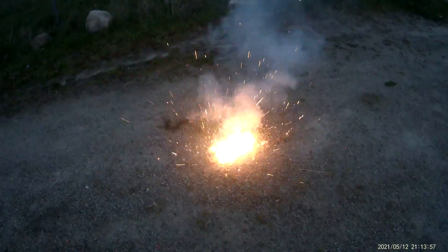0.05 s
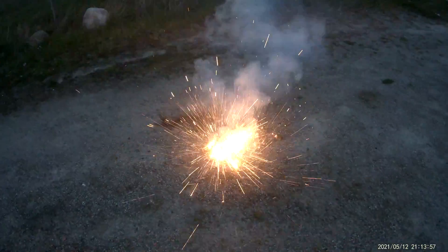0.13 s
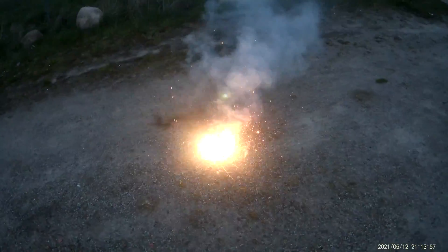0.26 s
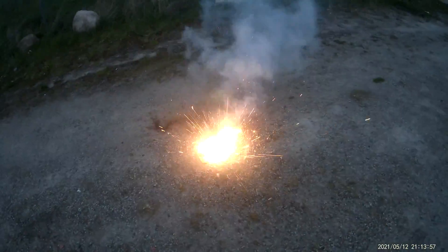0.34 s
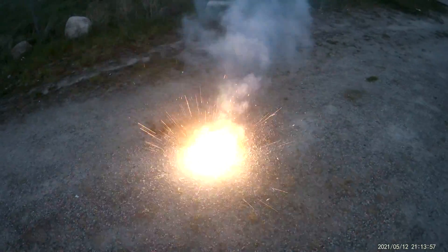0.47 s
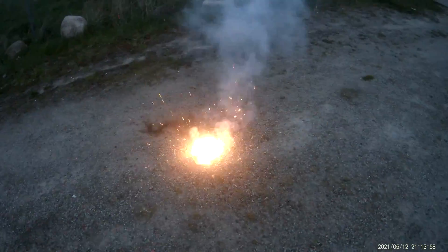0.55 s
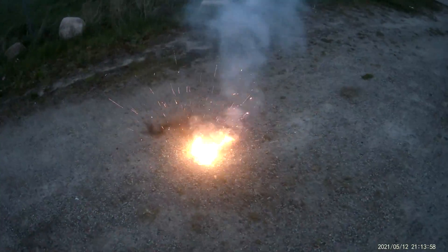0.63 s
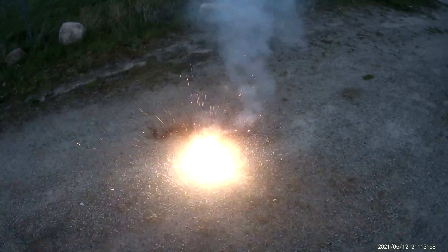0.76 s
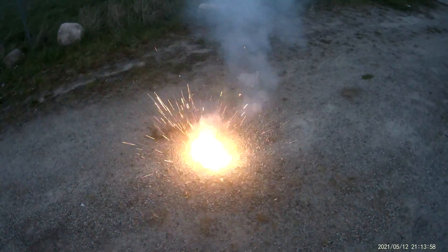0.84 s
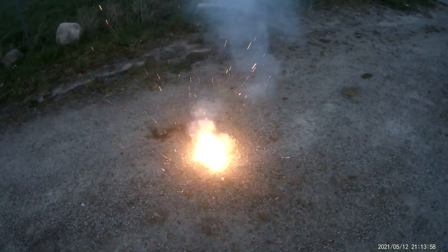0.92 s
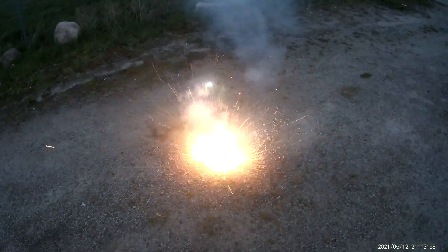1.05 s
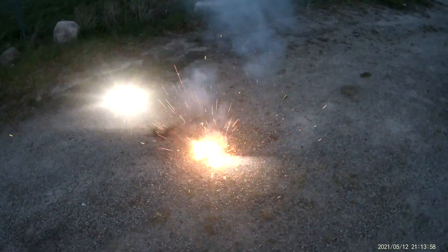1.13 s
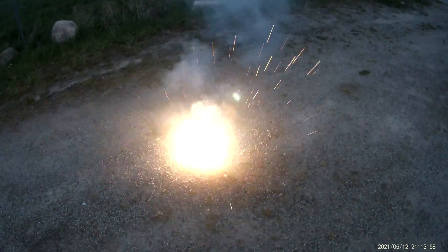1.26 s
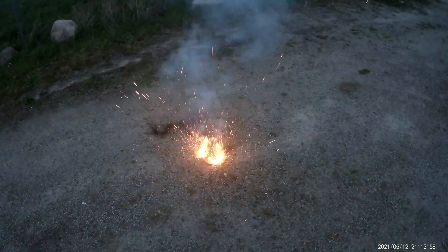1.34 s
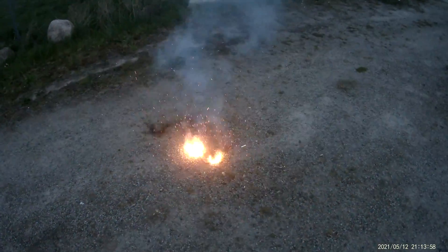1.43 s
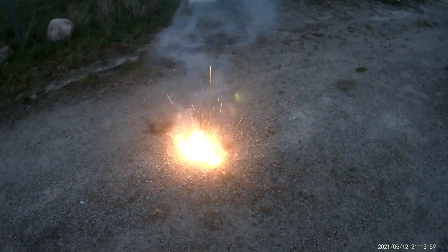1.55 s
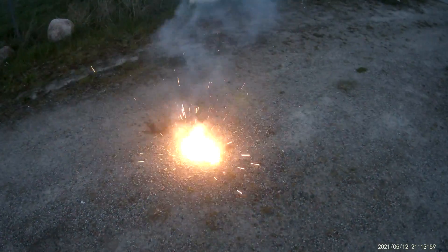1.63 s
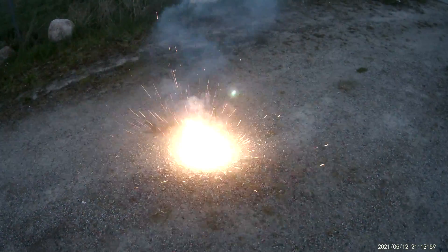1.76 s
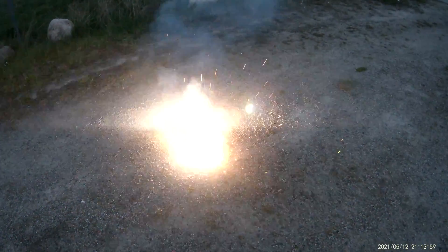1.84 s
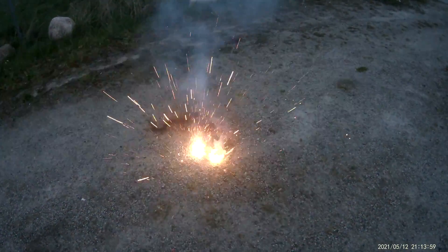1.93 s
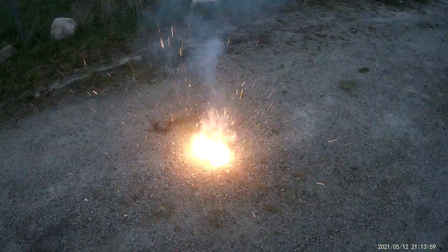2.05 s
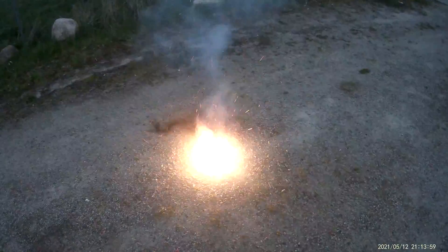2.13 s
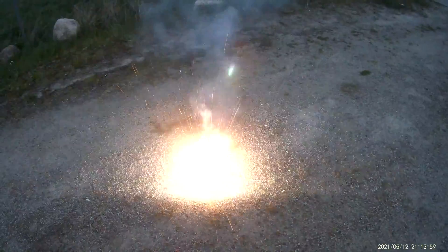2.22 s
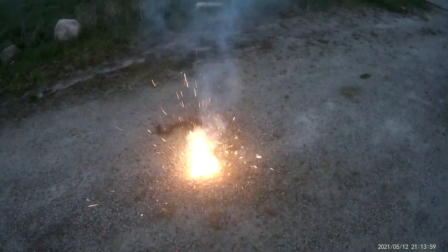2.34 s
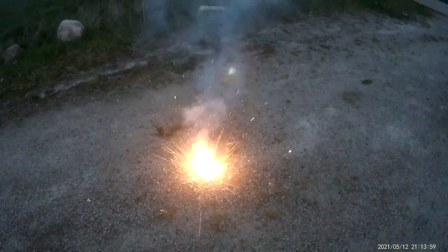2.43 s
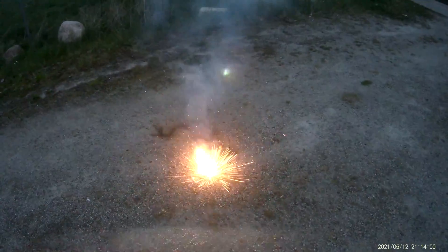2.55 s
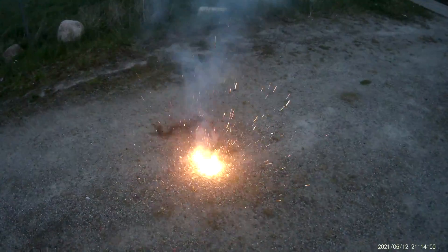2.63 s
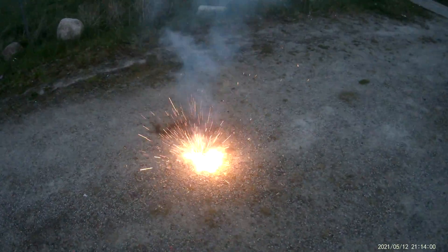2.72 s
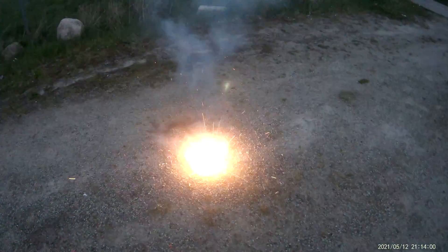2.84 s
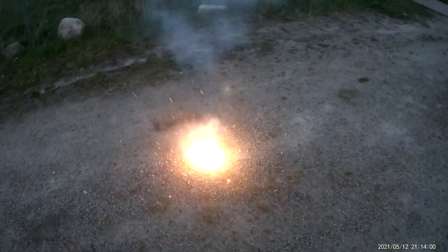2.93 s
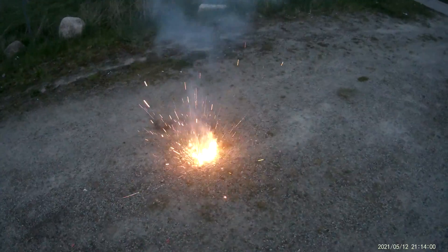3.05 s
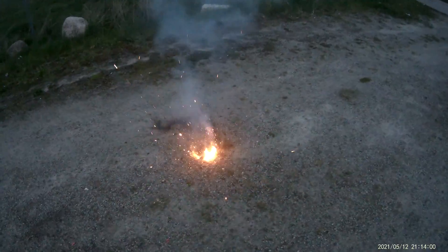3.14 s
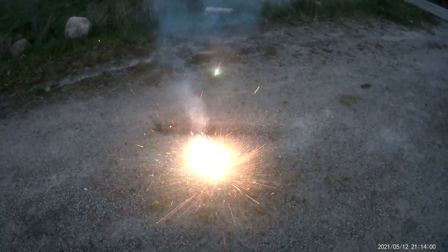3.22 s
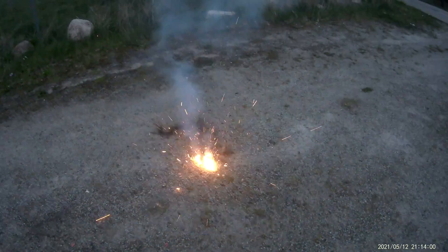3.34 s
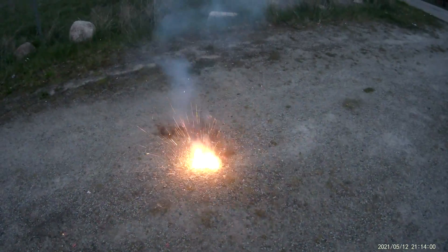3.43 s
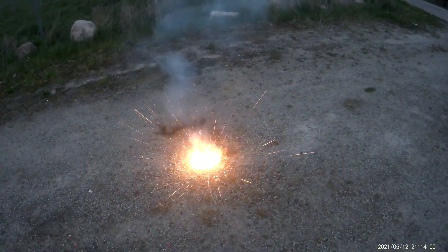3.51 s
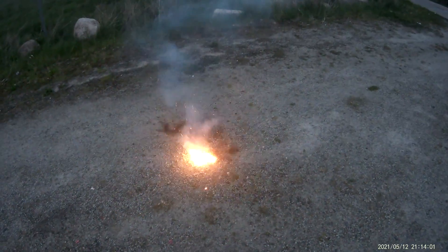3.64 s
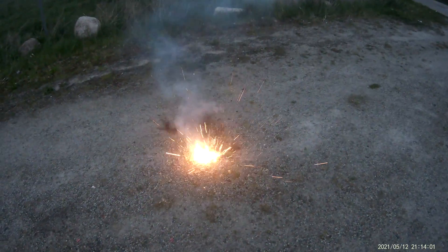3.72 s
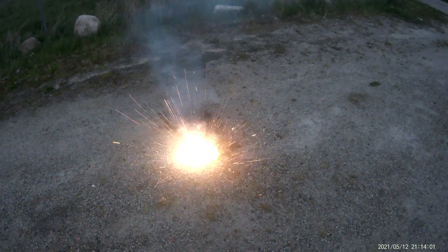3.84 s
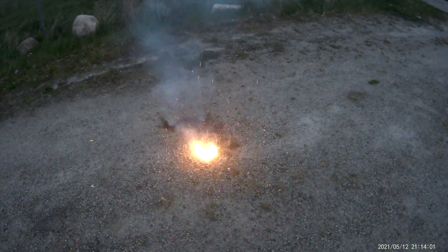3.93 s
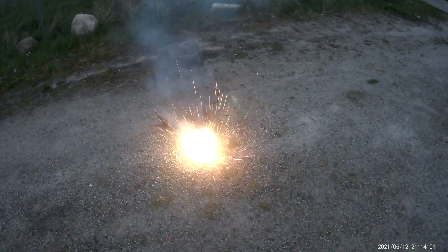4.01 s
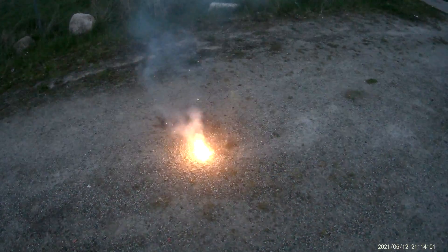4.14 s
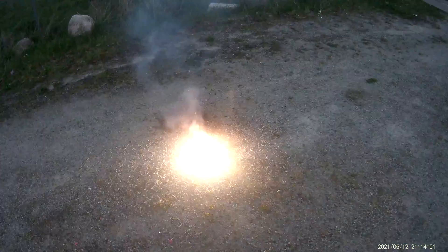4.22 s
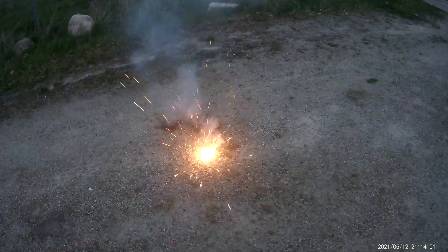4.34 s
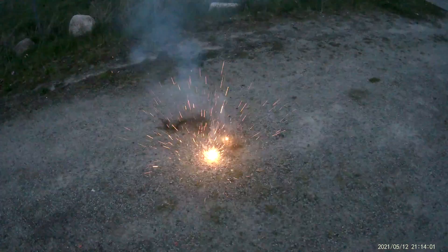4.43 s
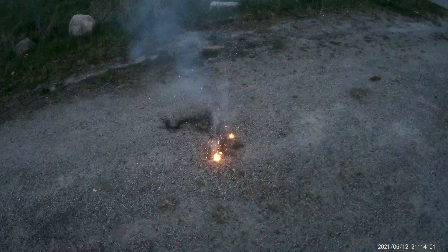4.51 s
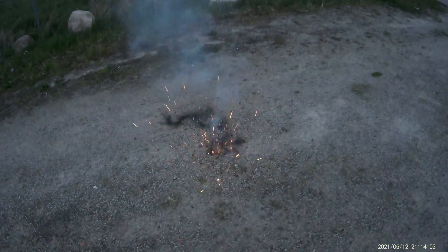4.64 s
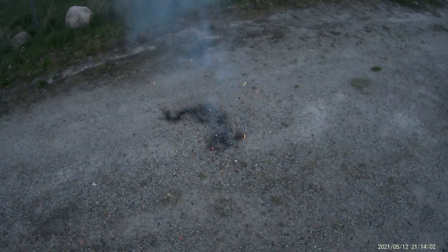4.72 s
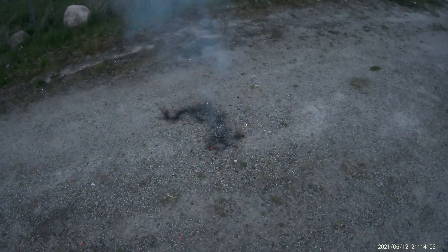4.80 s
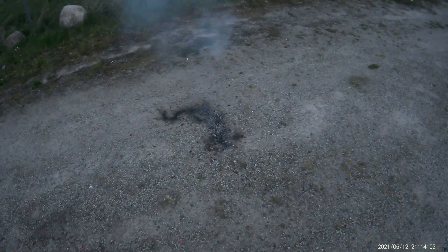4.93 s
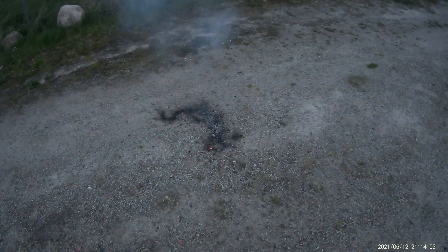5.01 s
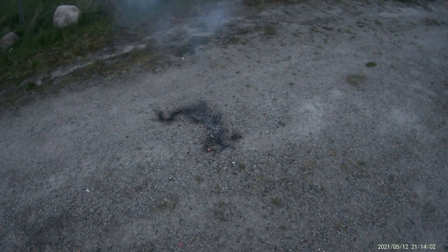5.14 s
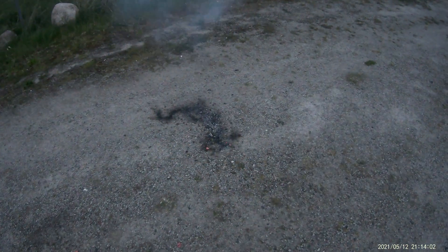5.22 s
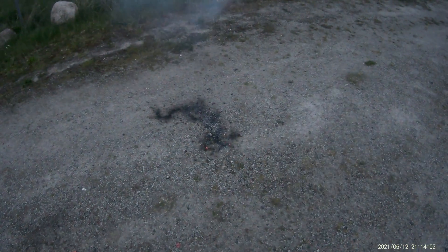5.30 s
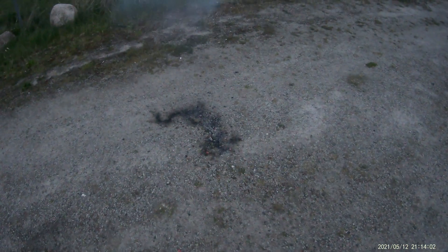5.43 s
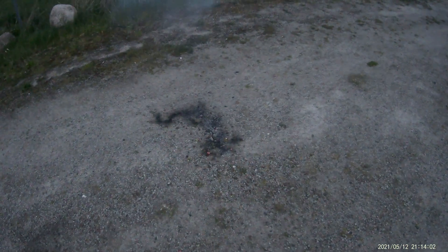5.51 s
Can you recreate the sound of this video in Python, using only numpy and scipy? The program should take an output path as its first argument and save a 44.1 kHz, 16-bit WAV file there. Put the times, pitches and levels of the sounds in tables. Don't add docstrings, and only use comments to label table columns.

```python
import sys
import numpy as np
from scipy import signal
from scipy.fft import rfft, irfft, next_fast_len
from scipy.io import wavfile
from scipy.ndimage import map_coordinates

SR = 44100
rng = np.random.default_rng(int(sys.argv[2]) if len(sys.argv) > 2 else 0)


def gain_from_decibels(decibels):
    exponent = np.asarray(decibels, float) / 20
    return 10 ** exponent


def generate_wav(signal):
    frames = np.transpose(np.atleast_2d(signal))
    scaled = np.clip(frames, -1, 1) * 32767
    pcm = np.round(scaled).astype(np.int16)
    wavfile.write(sys.argv[1], SR, pcm)


N = 245637
TIME = np.arange(N) / SR
BOUNCE_S = 0.0014

# (time [s], blast length [ms], level [dB], echo level [dB], brightness [dB])
FIRST = [(0.0001, 1.1, -6.5, -20.5, 3.5), (0.0049, 2, -6.5, -21.5, 6.5), (0.0087, 4.3, -2.5, -21.5, -2.3),
         (0.0155, 5, -4.5, -22.5, 0.6), (0.0213, 1.1, -6.5, -20.5, -5), (0.0523, 4.3, -5.5, -24.5, 1.7),
         (0.118, 3.8, -2.5, -23.5, 1.2), (0.1636, 3.9, 0.5, -23.5, -0.0), (0.3224, 2.4, -4, -21, 3.5),
         (0.3341, 6.4, 1, -22.5, 4.5), (0.3589, 1.7, -5.5, -35, -1.7), (0.3888, 4.1, -0.5, -23, 2.5),
         (0.4482, 3.8, -4, -22, -0.1), (0.5038, 3.1, -4.5, -23.5, 5), (0.5152, 4.3, -2.5, -18, 2.2),
         (0.5366, 3.6, -2.5, -18.5, -1.5), (0.548, 4.2, -5.5, -27, 4), (0.6695, 5.2, -3, -25, 3),
         (0.7519, 3.7, -3, -19, 1.4), (0.8046, 2.4, 0, -17, 4), (0.831, 14, -4, -12.5, 1.5),
         (0.8706, 4.1, -8.5, -13.5, 2.5), (0.8756, 4.8, -2.4, -11.5, -0.5), (0.9149, 3.3, -1, -22.0, 3.5),
         (0.923, 5.8, -4.5, -13.5, -2.5), (1.0348, 2.6, -3.2, -27.5, 0.8), (1.0766, 5.0, -2, -20, 1.1),
         (1.088, 3.6, -7, -21.5, 0.3), (1.1067, 4.4, -3, -24.5, -1.2), (1.1159, 1.9, -1, -25, -3),
         (1.1258, 6.6, -4.5, -21, 2), (1.1723, 2, -3, -29, 1.3)]
MIDDLE = [(1.1932, 4.3, -3, -29.5, 0), (1.2036, 3.8, -2.5, -21.5, -0.5), (1.2495, 3.6, -2, -28.5, 7),
          (1.2925, 5.7, -5, -22.5, -1.5), (1.3114, 8, -3, -21, -0.5), (1.3214, 4.5, -6, -18, 2),
          (1.327, 7.4, -4, -23, 1.2), (1.3538, 5.4, -4.5, -16, 4.5), (1.4133, 4.6, -0.5, -22.0, 5),
          (1.425, 5.9, -1.5, -13.5, 1.5), (1.6537, 0.57, -2, -30.5, -2), (1.72, 3.2, -4, -26.5, -3.5),
          (1.752, 1.6, -3.8, -26, -3.1), (1.8004, 2, -6.5, -27.5, -8), (1.8091, 2.5, -2.5, -24, -3),
          (1.8292, 1, -3, -29.5, -4), (1.8948, 5.6, -3.5, -21, -0.2), (1.902, 5.7, -4.0, -19, -1),
          (1.9481, 2.7, -3, -22.5, -3.5), (1.9527, 4.2, 0, -24, 5), (1.9685, 4.2, -3, -18, 3),
          (2.0426, 5.7, -5, -21.5, 9), (2.0557, 4.3, -1.5, -19.5, 3), (2.2016, 6, -4, -20.5, -1.3),
          (2.2422, 3.3, 0, -19.5, -0.6), (2.42, 3.8, -3, -21.5, 2.5), (2.429, 3.1, -2, -18.5, 1.5),
          (2.4909, 8.6, -5.3, -19.5, 5), (2.4962, 2.6, -9.5, -22.5, 2.5), (2.5423, 4.7, -2, -16.5, -0.3),
          (2.6236, 3.3, -4, -22.5, -0.6), (2.7817, 2.4, -5.5, -25.5, -4.5)]
LAST = [(2.8261, 9.9, -3, -12, 3), (2.9394, 4.2, -4, -18, 0.5), (2.9497, 3.1, 0.5, -17.5, 2.5),
        (3.0492, 0.9, -3, -35, -4.5), (3.0656, 5.4, -2.5, -20, 0.5), (3.0763, 2.3, -4.3, -29.5, -0.7),
        (3.112, 3.6, 0.2, -15.5, -0.6), (3.1221, 2.4, -5, -24.5, -2.7), (3.247, 3.2, -2.5, -22.0, -4.5),
        (3.2682, 9.5, -3, -21.5, 3), (3.2797, 2.6, -4.9, -17.5, -2), (3.2932, 6.9, -5, -22.5, -1.7),
        (3.2997, 6, 0, -17.5, -1.7), (3.323, 2.4, -6.5, -24.5, -0.3), (3.4623, 2.9, -3, -20, 3),
        (3.5321, 3.5, -5.5, -22.5, -1.4), (3.7513, 4.1, -3.5, -18, -2.2), (3.8216, 2.6, -2, -24.5, -1.6),
        (3.8299, 2.9, -7, -30, 1.5), (3.8712, 4.1, -4, -21, -1), (3.9008, 5.7, -2, -22.0, 2.5),
        (3.921, 4.6, -2.5, -22.5, 0), (3.9311, 2.9, -5.5, -28.5, -1), (4.0107, 3.6, -4.5, -26.5, 0),
        (4.0651, 3.8, -2.5, -19, -2.4), (4.3008, 4.6, -3.5, -27.5, -1.8), (4.3354, 2, -2.5, -18.5, -1.5),
        (4.3502, 2.5, -4.5, -28.5, -1.5), (4.4086, 2.8, -4.5, -27, 2.3), (4.4574, 3.2, 1.3, -21, 0.3),
        (4.4698, 3, -1.5, -16, 2), (4.6092, 2, -3.5, -26.5, -1.2)]
# (time [s], strength [1])
BARE = [(0.742, 0.77), (1.0633, 0.54), (1.173, .6), (1.7216, 0.32), (1.7506, 0.78), (1.7999, 0.53),
        (1.8107, 1), (1.83, 0.34), (2.7685, 1), (2.7833, 0.2), (2.8885, 0.55), (3.049, 0.44),
        (3.8192, 0.56), (4.012, 0.41)]
# (start [s], end [s])
DEAF = [
    (.0601, .093),
    (.1844, .230),
    (1.6105, 1.651),
    (2.0657, 2.126),
    (2.2901, 2.370),
    (2.6426, 2.695),
    (3.9385, 3.987),
]


def unit(x):
    return x / np.sqrt(np.mean(x ** 2) + 1e-20)


def filtered(x, response):
    m = next_fast_len(N + 8192)
    return irfft(rfft(x, m) * response(np.fft.rfftfreq(m, 1 / SR)), m)[:N]


def noise(spectrum):
    f, db = np.transpose(spectrum)
    return unit(filtered(rng.standard_normal(N), lambda hz: gain_from_decibels(np.interp(np.log(hz + 1), np.log(f), db))))


def wobble(rate_hz):
    return map_coordinates(rng.standard_normal(int(N * rate_hz / SR) + 4), [TIME * rate_hz])


def bump(s, width_s):
    return np.exp(-((TIME - s) / width_s) ** 2)


def add(track, s, shape):
    part = track[max(round(s * SR), 0):][:len(shape)]
    part += shape[:len(part)]


def burst(ms, length_ms, fall_db_per_ms):
    return (ms >= 0) * gain_from_decibels(-fall_db_per_ms * np.clip(ms - length_ms, 0, None))


def sparks():
    per_s, base_db, spread_db = 66, 7, 3.5
    size_db = base_db + spread_db * rng.exponential(size=N)
    ticks = (rng.random(N) < per_s / SR) * gain_from_decibels(size_db) * rng.choice([-1, 1], N)
    return filtered(3 * ticks, lambda hz: 1j * hz * 3000 / (3500 ** 2 - hz ** 2 + 1j * hz * 3000))


def fuse():
    # (time [s], level [dB])
    burning = [(0, -22.5), (.3, -33), (.8, -36), (1.3, -31.5), (1.55, -35), (2.15, -31.5), (2.75, -37),
               (3.4, -36.5), (4.15, -38.5), (4.28, -46.5), (4.55, -49.5), (4.75, -55), (5.0, -60.5),
               (5.57, -59.5)]
    # (frequency [Hz], density [dB per Hz])
    hiss_spectrum = [(120, -39), (200, -4.5), (366, -9.5), (409, -2), (482, 3), (709, -4), (4680, -3),
                     (14100, -12), (16000, -11.5)]
    gust_s, gust_width_s, gust_db = 5.16, .07, 5
    level_db = np.interp(TIME, *np.transpose(burning)) + gust_db * bump(gust_s, gust_width_s)
    hiss_db = level_db + 0.85 * wobble(44) + 1.8 * wobble(400)
    return gain_from_decibels(hiss_db) * noise(hiss_spectrum) + gain_from_decibels(level_db) * sparks()


def field():
    # (time [s], half length [s], rise [dB])
    swells = [
        (4.83, .03, 3),
        (5.02, .012, 5),
        (5.171, .012, 8),
        (5.25, .02, 3),
    ]
    # (frequency [Hz], density [dB per Hz])
    air_spectrum = [(180, -41), (300, 0), (1120, 3), (1210, 2.5), (2610, -9), (8090, -30.5), (8500, -28.5),
                    (14200, -24.5), (16000, -22)]
    level_db, rise_s, rise_db_per_s = -53.5, 5.3, 7
    rise_db = rise_db_per_s * np.clip(TIME - rise_s, 0, None)
    rise_db = rise_db + sum(db * bump(s, width_s) for s, width_s, db in swells)
    return gain_from_decibels(level_db + rise_db + 1.1 * wobble(3.4)) * noise(air_spectrum)


def wind():
    # (time [s], level [dB])
    breeze = [(0, -30), (.6, -31.5), (1.3, -29), (1.52, -38), (1.7, -30.5), (2.6, -33.5), (3.2, -26.5),
              (3.6, -33), (4.27, -26.5), (4.4, -39.5), (4.6, -22), (4.8, -26.5), (4.97, -23), (5.05, -35),
              (5.15, -24), (5.3, -38.5), (5.57, -31)]
    # (frequency [Hz], density [dB per Hz])
    thump_spectrum = [(8.8, -42), (15, 11), (29, -13.5), (49, -12.5), (120, -32.5), (160, -61.5),
                      (260, -120)]
    # (frequency [Hz], density [dB per Hz])
    flutter_spectrum = [(60, -22.5), (110, 0.5), (250, -4.5), (500, -16.5), (900, -54.5)]
    # (time [s], half length [s], rise [dB])
    puffs = [
        (4.28, 0.083, 16),
        (4.624, 0.14, 13),
        (4.766, 0.028, 13),
    ]
    start_db, fade_db_per_s = -45.5, 1.5
    thump_db = np.interp(TIME, *np.transpose(breeze)) + 0.98 * wobble(14.0)
    flutter_db = start_db - fade_db_per_s * TIME + sum(db * bump(s, width_s) for s, width_s, db in puffs)
    flutter = gain_from_decibels(flutter_db + 2.1 * wobble(25)) * noise(flutter_spectrum)
    return gain_from_decibels(thump_db) * noise(thump_spectrum) + flutter


def strip():
    # (time
    # [s], length [ms], level [dB], brightness [dB])
    weak_bursts = [(0.0246, 2.9, -14, 1.5), (0.028, 3.5, -14, 0.5), (0.0967, 2.0, -10, 5),
                   (0.1224, 2.5, -16.5, 3), (0.345, 5.5, -12, 2), (0.3612, 2.2, -9, 0.5),
                   (0.3942, 4.0, -10, -2.5), (0.3996, 4.1, -7, 3.7), (0.414, 1.6, -12.5, -0.8),
                   (0.52, 2.5, -11.2, -2.5), (0.6756, 2.3, -13, -2.5), (0.7416, 2.9, -9.5, 2),
                   (0.764, 2.3, -10.5, 3.5), (0.8413, 8.4, -8.5, -1), (0.863, 0.8, -4.5, 6),
                   (0.882, 4.2, -15, 0), (0.8872, 4.3, -9.5, 0), (1.0621, 2.6, -11.5, 2),
                   (1.082, 3.9, -11, -2.4), (1.1187, 2.6, -13, 3), (1.1314, 2.8, -11.5, -2.8),
                   (1.137, 4.1, -13, -2.5), (1.2098, 1.9, -13.5, 0.5), (1.216, 2.6, -12, -1.5),
                   (1.254, 2.0, -12, 4), (1.261, 0.9, -14, 0.7), (1.3048, 3.7, -11, -4.5),
                   (1.3357, 8.0, -7, -1.7), (1.3587, 3.6, -10.7, -2), (1.3654, 3.2, -10.5, -3),
                   (1.4207, 1.8, -12, 2.5), (1.4329, 3.2, -15.5, 2.2), (1.4371, 3.9, -15, -8),
                   (1.9084, 5.9, -12, -5.8), (1.9191, 1.8, -11, 0), (1.9222, 3.5, -11.5, -1),
                   (1.9598, 3.5, -12.5, -3.5), (1.9635, 2.0, -11.5, -2), (1.9789, 2.2, -15, -6.5),
                        (2.254, 2.2, -15, -4), (2.4256, 1.9, -6.5, -0.5), (2.4332, 2.7, -9, 3.5),
                        (2.4408, 2.5, -13, -1.5), (2.5, 4.9, -10.9, -0.5), (2.5477, 2.4, -16.5, 0.5),
                        (2.5515, 3.9, -11, -1.5), (2.767, 2.7, -10.5, -10.5), (2.8369, 3.6, -10, -3.5),
                        (2.8879, 3.4, -8.0, -3), (2.9443, 2.3, -13.5, -0.3), (2.9558, 3.1, -11.5, -3.5),
                        (2.962, 2.1, -10.2, -2.5), (2.9962, 3.0, -9.5, 1.5), (3.0784, 2.2, -8.5, -2.0),
                        (3.1172, 4.1, -15.5, 2.5), (3.258, 2.6, -15, 1), (3.2855, 2.9, -14, 2),
                        (3.3084, 9.0, -8.5, 4), (3.3194, 2.2, -5.5, -0.8), (3.326, 3.6, -11.5, 1.2),
                        (3.3316, 3.5, -13.5, 3.7), (3.8247, 4.1, -7.5, 1), (3.8445, 1.7, -14, -3.5),
                        (3.8485, 2.7, -12, 2), (3.8754, 2.2, -13, 3), (3.881, 4.3, -15.5, -5.3),
                        (3.9086, 6.8, -11.5, 1.3), (3.9285, 3.7, -10, 3.5), (4.0778, 2.3, -13.5, 0.5),
                        (4.3589, 2.5, -11.5, 1.5), (4.4808, 2.8, -12.5, 1.3)]
    # (time [s], length [ms], level [dB], brightness
    # [dB])
    short_bursts = [
        (1.3095, 1.5, -6, -3.5),
        (1.8932, 1.4, -3, -3),
        (3.2926, 2.1, -2.5, -0.5),
        (2.3735, 3, -16, 0),
        (2.6428, 1, -0.5, 2),
    ]
    weak_echo_db, plain_colour_hz = -26.5, 3334
    weak = [(s, ms, db, weak_echo_db, bright_db) for s, ms, db, bright_db in weak_bursts + short_bursts]
    return [(*row, plain_colour_hz * gain_from_decibels(bright_db)) for *row, bright_db in FIRST + MIDDLE + LAST + weak]


def fronts(crackers):
    out, ms = np.zeros(N), np.arange(SR // 150) / SR * 1000
    shape = np.where(ms < .17, -1.6, np.exp(-ms / 1.4) - 0.31 * np.exp(-ms / 5.9))
    for s, strength in BARE + [(pop[0], 0.45 * gain_from_decibels(pop[2])) for pop in crackers]:
        add(out, s - .0001, 0.78 * strength * shape)
        add(out, s + BOUNCE_S, 0.5 * strength * shape)
    return out


def pops(crackers):
    # (delay [ms], length [ms], level [dB])
    echoes = [
        (6.4, 1.5, 1),
        (11.3, 2.6, 0),
        (17.4, 1.2, -8),
        (26.3, 1.6, -5),
        (29.6, 2.5, -5),
    ]
    # (frequency [Hz], density [dB per Hz])
    blast_spectrum = [(88, -20.5), (150, -1), (1140, -3.5), (1290, -12), (1420, -0.5), (1530, -5),
                      (3620, -5.5), (14200, -13.5), (16000, -27)]
    # (frequency [Hz], width [Hz])
    port = [(3000, 700), (4000, 730), (5200, 1000)]
    port_db, port_reach = -12.5, .2
    sag_db_per_ms = 0.5
    air_hz, air_loss_db = 6570, -1.5
    ms = np.arange(SR // 10) / SR * 1000
    dull, bright, airy = np.zeros(N), np.zeros(N), np.zeros(N)
    ring = np.zeros((len(port), N))
    gravel = gain_from_decibels(-3.0) * burst(ms, 5.1, fall_db_per_ms=0.5)
    scatter_db = rng.normal(0, 0.53, (len(crackers), len(echoes)))
    for (s, length_ms, db, echo_db, colour_hz), spread_db in zip(crackers, scatter_db):
        true_db = db - 4.5 + 1.88 * max(db + 4.5, 0)
        blast = gain_from_decibels(true_db + sag_db_per_ms * (2 - ms)) * burst(ms, length_ms, fall_db_per_ms=7.0)
        returns = 0
        for (lag_ms, span_ms, gain_db), d in zip(echoes, spread_db):
            returns = returns + (gain_from_decibels(gain_db + d) * burst(ms - lag_ms, span_ms, fall_db_per_ms=9.5)) ** 2
        power = blast ** 2 + gain_from_decibels(echo_db - 2.5) ** 2 * (returns + gravel ** 2)
        airy_power = blast ** 2 + gain_from_decibels(air_loss_db) ** 2 * (power - blast ** 2)
        add(dull, s, power * (3300 / colour_hz) ** 3)
        add(bright, s, power * (colour_hz / 3300) ** 0.27)
        add(airy, s, airy_power * (colour_hz / 3300) ** 0.6)
        answer_hz = np.sqrt(colour_hz * port[1][0])
        for track, (port_hz, width_hz) in zip(ring, port):
            add(track, s, power * np.exp(-(np.log(port_hz / answer_hz) / port_reach) ** 2))
    grain = gain_from_decibels(2.2 * wobble(1300))
    raw = noise(blast_spectrum)
    low = filtered(raw, lambda f: 1 / (1 + (f / 2200) ** 4))
    air = filtered(raw, lambda f: 1 / (1 + (air_hz / (f + 1)) ** 4))
    middle = raw - low - air
    tones = [unit(filtered(raw, lambda f: np.exp(-((f - hz) / width_hz) ** 2))) for hz, width_hz in port]
    ringing = gain_from_decibels(port_db) * (np.sqrt(ring) * tones).sum(axis=0)
    return grain * (np.sqrt(dull) * low + np.sqrt(bright) * middle + np.sqrt(airy) * air + ringing)


def bias():
    # (time [s], bias shift [1])
    strong = [(.1633, .12), (.3227, .1), (.3885, .14), (.9228, .2), (1.3095, .25), (1.326, .16),
              (1.335, -.15), (1.3541, .12), (1.8932, .3), (1.905, -.2), (1.9536, .16), (2.8261, -.35),
              (2.8365, .2), (2.8893, -.1), (3.2685, -.35), (3.279, .2), (3.2926, .4), (3.3017, .15),
              (3.323, .12), (3.8251, -.4), (3.921, .38), (4.3009, .15), (4.3355, .1)]
    bare_shift, pop_shift = 0.038, 0.013
    out, ms = np.zeros(N), np.arange(SR // 12) / SR * 1000
    leak = np.exp(-ms / 6) - 0.11 * (1 - np.exp(-ms / 6)) * np.exp(-ms / 30)
    small = [(s, bare_shift) for s, strength in BARE]
    small += [(pop[0], pop_shift) for pop in FIRST + MIDDLE + LAST]
    for s, shift in strong + small:
        add(out, s, 1.82 * shift * leak)
    return out


def cracks(crackers):
    # (time [s], peak [dB])
    single = [(.9747, -8), (.9854, -20.5), (1.4735, -15), (1.4855, -5), (2.1301, -3.5), (2.1545, -7),
              (1.3805, -5), (4.5595, -24), (4.565, -25), (2.4588, 1), (2.601, -7), (2.6368, -3),
              (2.7442, -22), (2.8927, 8.5), (3.0107, -16), (3.1717, -5), (3.3524, -2.5), (3.3626, -7),
              (4.0174, 2.5), (4.1245, -12), (4.5178, -7), (4.5297, -10.5), (4.6683, -20), (5.1991, -27)]
    # (delay [s], level over echo [dB])
    banks = [
        (.0064, 1),
        (.0112, 6),
        (.0174, -3),
        (.0286, -1),
        (.0597, -9),
    ]
    bank_scatter_db = 2
    wall_s, wall_db = .0602, -5
    heard = single + [(start + wall_s, wall_db) for start, end in DEAF if end < start + wall_s - .002]
    scatter_db = bank_scatter_db * rng.standard_normal((len(crackers), len(banks)))
    for pop, row in zip(crackers, scatter_db):
        heard += [(pop[0] + lag_s, pop[3] + db + d) for (lag_s, db), d in zip(banks, row)]
    out, ms = np.zeros(N), np.arange(SR // 100) / SR * 1000
    u = ms / 0.065
    front = (u - 1.1) * np.exp(-u) * np.minimum(u * 2, 1)
    rustle = rng.standard_normal((len(heard), len(ms)))
    for (s, db), hiss in zip(heard, rustle):
        add(out, s + .0008, gain_from_decibels(db + 11) * (front + .1 * hiss * gain_from_decibels(-4.5 * ms)))

    def path(hz):
        return 1j * hz / (1500 + 1j * hz) / (1 + 1j * hz / 7000) ** 2 / (1 + (hz / 11000) ** 4)
    return filtered(out, path)


def pinned():
    # (jump [1], leak [dB], leak fading [dB/s], sag on release [1], recovery [ms])
    stuck = [(0.63, -1.5, 159.5, .17, 35), (.32, -2.5, 119.5, .12, 43), (.5, -15, 399, 0.17, 85),
             (0.5, -6.5, 199, .17, 40), (0.47, -13, 98.5, 0.14, 49), (0.55, -19, 497.5, .15, 50),
             (.2, 7, 598.5, .12, 45)]
    # (time [s], rebound [1])
    flicks = [(0.066, 0.3), (0.0799, 0.97), (0.0842, 1), (0.0862, 0.12), (0.1839, 0.34), (.2099, 0.79),
              (0.2131, 0.79), (0.2147, 0.29), (1.6253, 0.86), (2.0827, 1), (2.0872, 0.98), (2.0895, 0.28),
              (2.0933, 0.17), (2.0942, 0.79), (2.0968, 0.31), (2.344, 0.94), (2.29, 0.33), (2.346, 0.23),
              (2.3525, 0.42), (2.6455, 0.17)]
    gain, offset, ms = np.ones(N), np.zeros(N), np.arange(SR // 6) / SR * 1000
    slam = 1.67 * burst(ms, 2.6, fall_db_per_ms=30)
    for (start, end), (jump, leak_db, fade_db_per_s, sag, recovery_ms) in zip(DEAF, stuck):
        leak = gain_from_decibels(leak_db - fade_db_per_s * np.clip(TIME - start, 0, .07))
        gain *= 1 - (1 - leak) * (TIME > start) * np.clip((end - TIME) / 0.0013 + 1, 0, 1)
        hold = np.exp(-ms / 9) - 0.14 * np.clip((end - start) * 1000 + 1 - ms, 0, 1)
        add(offset, start, slam + jump * hold)
        add(offset, end, -sag * (1 - np.exp(-ms / 4)) * np.exp(-(ms / recovery_ms) ** 2))
    slams = [(start + lag_s, size) for start, end in DEAF for lag_s, size in [(.0001, 0.44), (BOUNCE_S, 0.2)]]
    after_ms = ms[:300] - .1
    for s, rebound in flicks + slams:
        add(offset, s - .00005, np.where(after_ms < 0, -2.5, 1.5 * rebound * np.exp(-after_ms / 0.42)))
    return gain, offset


def scene():
    crackers = strip()
    bed = fuse() + field() + wind()
    return (bed + fronts(crackers) + pops(crackers) + cracks(crackers))[None]


def low_pass(x):
    return signal.sosfilt(signal.butter(12, 16540, fs=SR, output="sos"), x)


def record(dry):
    rail = .7
    gain, offset = pinned()
    x = gain * (dry[0] + bias()) + offset
    x = x / (1 + np.abs(x / rail) ** 8) ** (1 / 8)
    x = filtered(x, lambda hz: gain_from_decibels(-5.5 * np.exp(-((hz - 270) / 60) ** 2)) * (hz > 2))
    return low_pass(x)


dry = scene()
out = record(dry)
generate_wav(out)
```